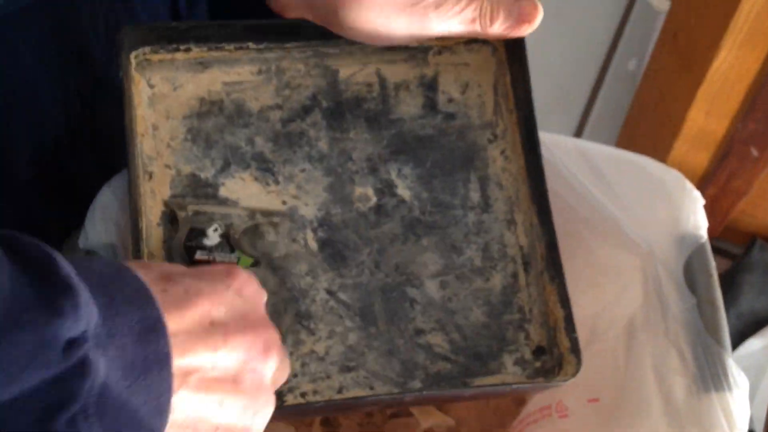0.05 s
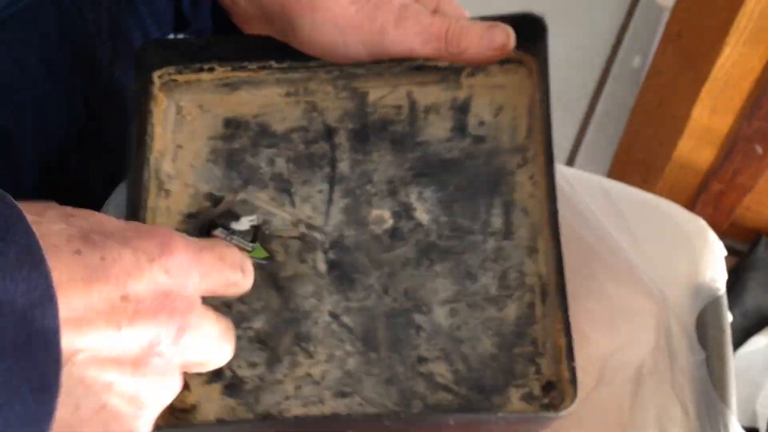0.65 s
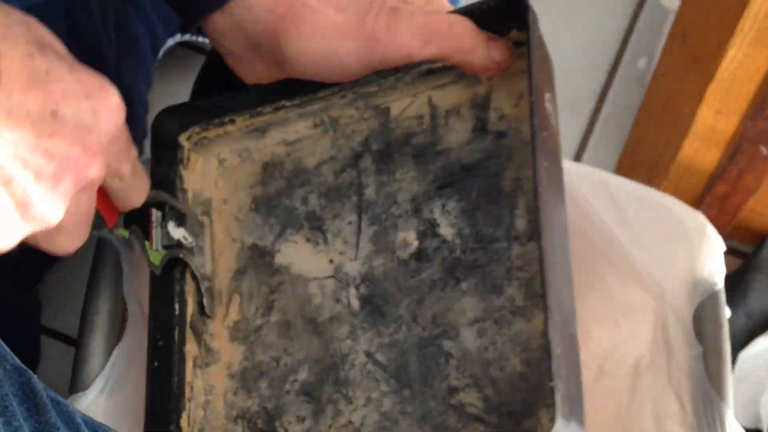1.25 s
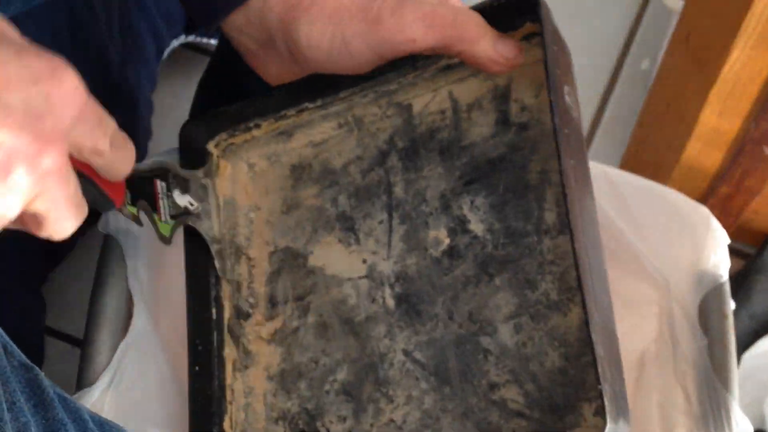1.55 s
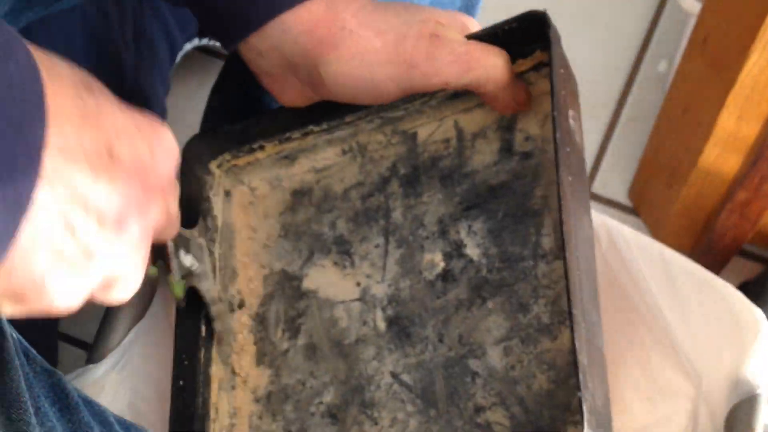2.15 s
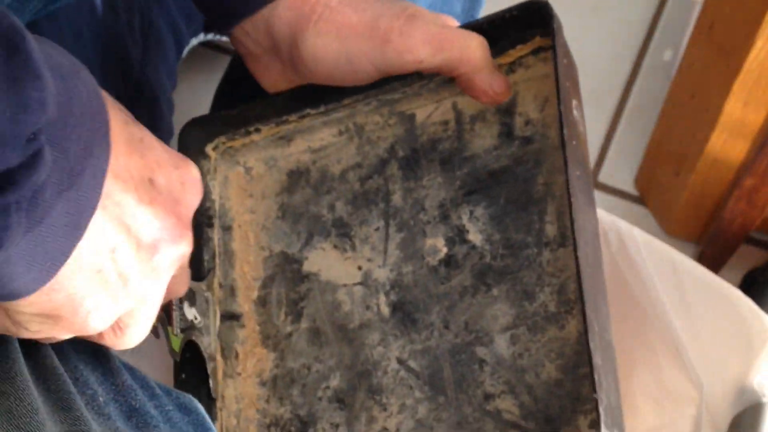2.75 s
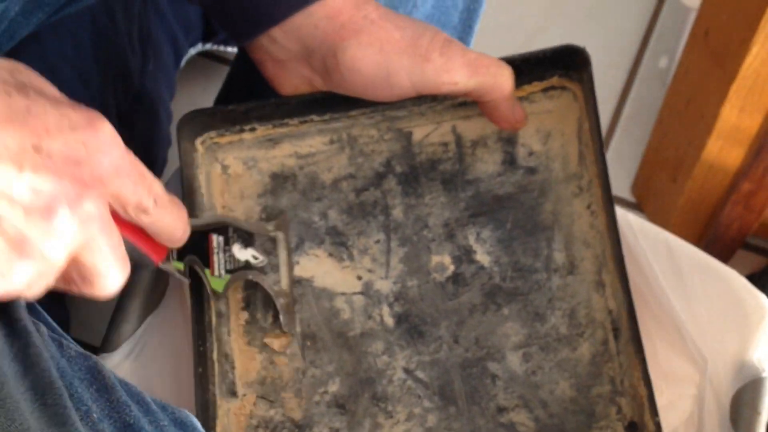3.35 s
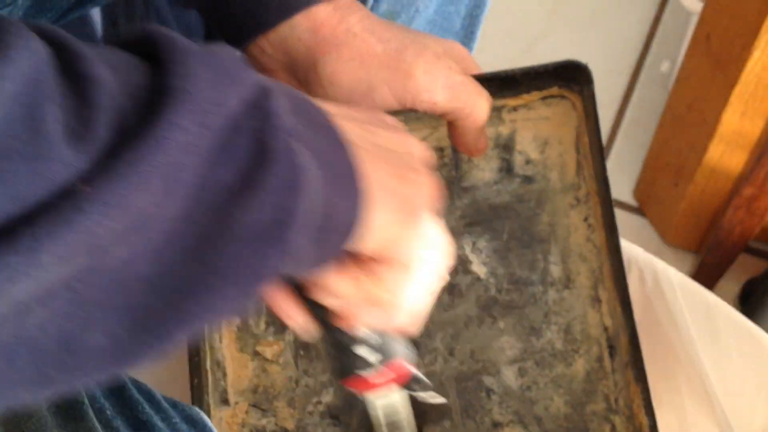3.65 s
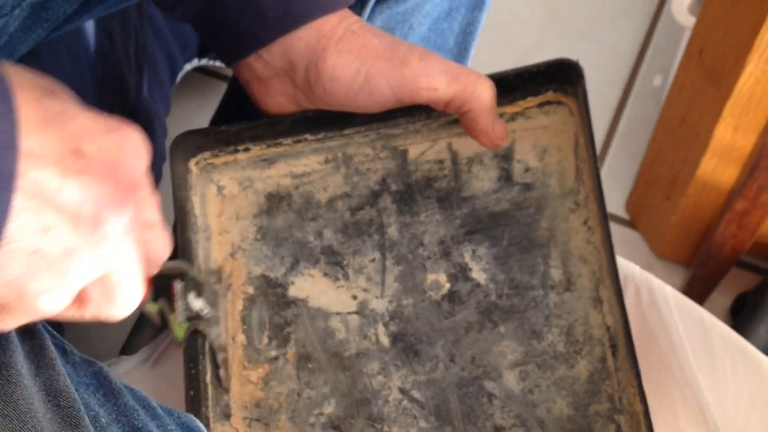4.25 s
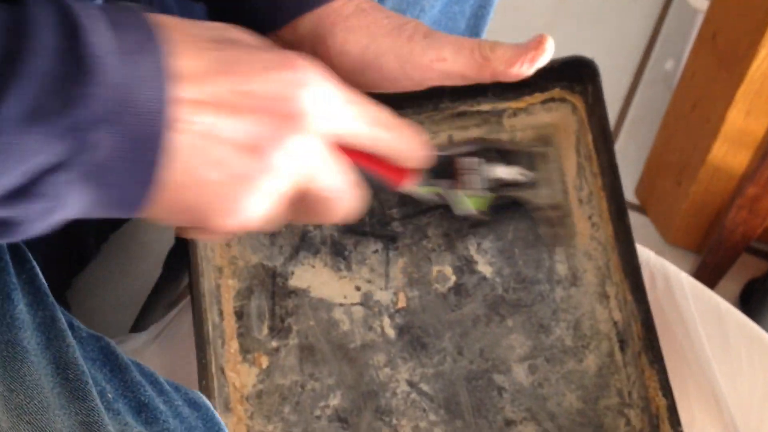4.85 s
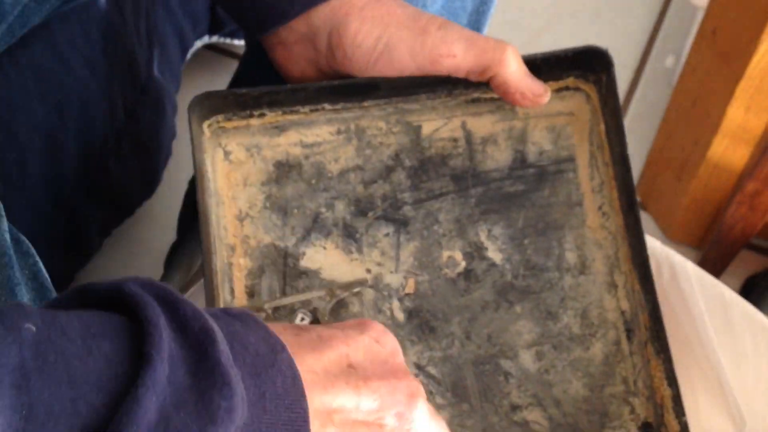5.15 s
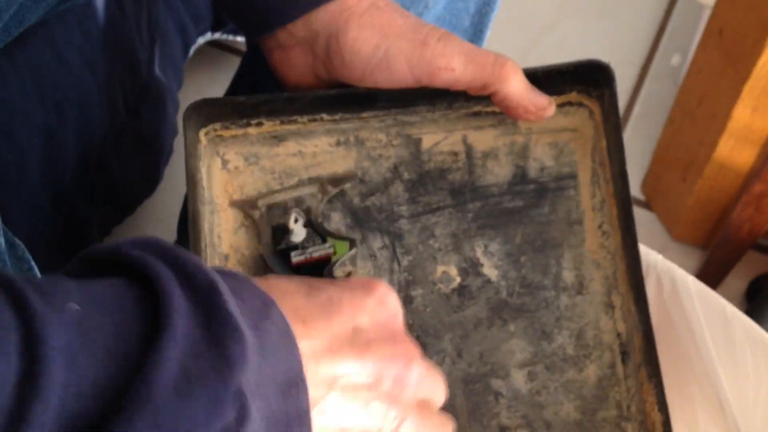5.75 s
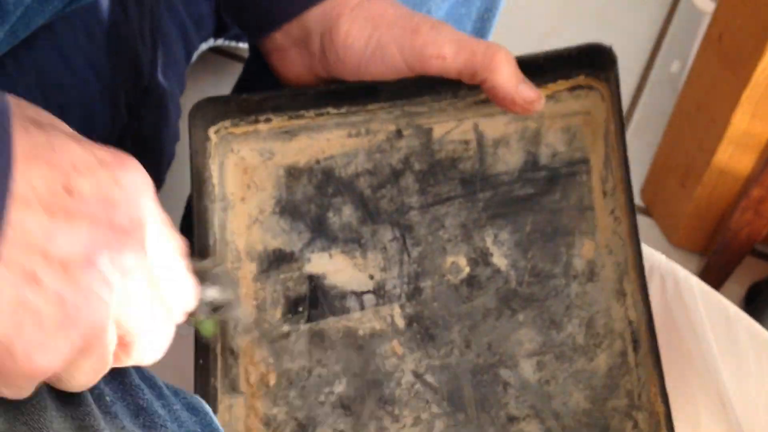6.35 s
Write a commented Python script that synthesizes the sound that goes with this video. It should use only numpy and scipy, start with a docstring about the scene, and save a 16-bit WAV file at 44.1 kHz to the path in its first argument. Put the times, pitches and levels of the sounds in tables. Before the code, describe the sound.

A small steel scraper scratches and chips hard crust off a metal pan, with irregular gritty rasps, ticks and dull knocks.

```python
"""Scraping scale off a pan

A steel hand scraper works hard mineral scale off a hand-held pan, close by in a small room.
Short bites and longer drags crush grit under the edge, and the grit rings both pan and blade.
The edge knocks on the crust and skids lightly over it; crumbs snap off with bright ticks and patter down.
The pan bumps dully in the hand as the blade lets go. Faint room tone lies underneath."""
import sys
import numpy as np
from scipy import signal
from scipy.fft import rfft, irfft, next_fast_len
from scipy.io import wavfile
from scipy.ndimage import uniform_filter1d

SR = 44100
rng = np.random.default_rng(int(sys.argv[2]) if len(sys.argv) > 2 else 0)


def master(y):
    """Save y as 16-bit WAV."""
    cut = np.clip(np.atleast_2d(y).T, -1, 1)
    pcm = np.round(cut * 32767)  # scale
    wavfile.write(sys.argv[1], SR, pcm.astype(np.int16))


N = 291060

# the edge digs in: t/s of greatest force, rise/s, fine grit level/dB, coarse over fine/dB
BITES = [(-.008,0.017,-65.5,17),(0.063,0.029,-66,-1),(.239,0.013,-50.5,4),(.303,0.013,-53,-1.5),(.359,0.0067,-51,11),(.376,0.013,-45.5,-3),(.438,0.015,-55,-5.5),(0.505,.008,-61.5,7.5),(0.548,0.0092,-55.5,0.5),(.593,0.014,-53,-0.5),(0.666,0.013,-67.5,5),(.786,0.0066,-85,21),(.903,0.0081,-68,11.5),(.943,0.016,-60.5,4.5),(.987,0.013,-62,8.5),(1.067,0.0086,-66.5,11.5),(1.1,0.0049,-68.5,14),(1.166,0.0069,-39.5,5),(1.32,0.022,-52.5,5),(1.414,.012,-60.5,7.5),(1.476,0.0075,-46.5,2),(1.575,0.012,-61,4),(1.751,0.011,-43,4.5),(1.915,0.026,-66.5,11.5),(1.944,0.0025,-49.5,8),(1.989,0.0057,-38.5,4.5),(2.063,0.02,-58,-0.5),(2.134,.012,-42.5,4.5),(2.212,0.0092,-51,0.5),(2.271,0.014,-52.5,5),(2.294,0.0091,-38.5,-1.5),(2.358,0.013,-50,1),(2.403,0.0093,-44,5),(2.464,.012,-53.5,5),(2.512,0.0067,-47,6.5),(2.549,0.0087,-44.5,7.5),(2.62,0.023,-58,1.5),(2.717,0.0088,-79,18.5),(2.787,.013,-59.5,9.5),(2.877,.0074,-39,5),(3.006,0.012,-42.5,-1.5),(3.062,.014,-55,-1.5),(3.1,0.0098,-49.5,3.5),(3.17,0.019,-54.5,-3),(3.231,.01,-56,0.5),(3.332,0.0053,-80,26),(3.416,0.0075,-68.5,5.5),(3.532,0.012,-75.5,9),(3.664,0.0083,-57.5,1),(3.709,0.0055,-54,-4.5),(3.752,0.011,-61.5,-2.5),(3.785,0.0069,-59.5,6.5),(3.955,.013,-54.5,4.5),(4.068,0.017,-61.5,-3),(4.13,0.012,-61.5,-1.5),(4.164,0.01,-56.5,0),(4.243,0.018,-61.5,4),(4.329,0.0059,-62,-6),(4.38,0.011,-56,-0.5),(4.447,0.0033,-44.5,-3.5),(4.462,0.0086,-56,6),(4.549,0.0095,-59.5,1.5),(4.637,0.014,-54.5,8),(4.701,0.019,-57.5,1),(4.893,0.019,-59,-13),(4.947,0.0098,-54.5,-2),(5.031,0.014,-56.5,-3),(5.115,0.0055,-75,17),(5.147,0.0073,-65.5,10.5),(5.189,.013,-64,2.5),(5.303,.011,-65.5,12),(5.415,.016,-48,6.5),(5.468,0.016,-45.5,-4.5),(5.544,0.0083,-53,5),(5.586,.011,-55,10.5),(5.634,0.012,-50.5,2),(5.667,0.01,-47,6.5),(5.713,0.013,-54,-10),(5.822,0.0083,-44.5,6.5),(5.91,0.0086,-46.5,-10),(5.972,0.008,-45.5,-3),(6.07,0.012,-59.5,12.5),(6.124,0.01,-51.5,4),(6.187,0.024,-54,-1),(6.251,0.012,-49.5,0),(6.499,0.0085,-73,16.5),(6.557,0.011,-50.5,3)]
# the edge slides on: start/s, end/s, fine grit level/dB, coarse over fine/dB
DRAGS = [(0.162, 0.224, -61, 4), (0.245, 0.378, -65, 1.5), (.42, 0.628, -75, -2.5),
         (.872, 1.037, -77.5, 4.5), (1.181, 1.428, -77, -16), (2.937, 2.973, -53.5, -0.5),
         (3.421, 3.54, -83, -14), (3.662, 3.89, -76.5, 4), (4.025, 4.14, -71.5, 3), (4.226, 4.277, -61, -2),
         (4.306, 4.348, -59.5, -1), (4.781, 4.845, -55.5, -8.5), (4.989, 5.033, -56.5, -10.5),
         (5.581, 5.612, -58, 3), (5.663, 5.73, -52.5, -2.5), (5.782, 5.868, -54, -4.5),
         (5.893, 5.945, -53, -11.5), (5.993, 6.028, -52, -8), (6.06, 6.104, -62, 2.5),
         (6.137, 6.213, -53.5, -2), (6.24, 6.262, -57.5, 1)]
# the pan's thud under the scraping: t/s, level/dB over the coarse grit
THUD = [(0, 6), (.45, -3), (1.15, 1), (1.47, -3.5), (1.8, 2), (2.1, -5.5), (2.55, -2.5), (3.2, 3),
        (4.5, 7.5), (4.64, -4.5), (4.72, -1), (4.87, -7), (5.2, 6), (5.42, -13), (5.67, -5), (5.83, -13),
        (6, -1), (6.25, -14), (6.55, 6.5)]
# the edge knocks on the crust: t/s, level/dB
LANDINGS = [(0.6927, -38.5), (0.8572, -36), (1.291, -38), (1.5634, -37), (1.6223, -44.5), (1.736, -26.5),
            (2.0978, -39), (2.2545, -45), (2.2887, -26), (2.543, -36), (2.6058, -36.5), (2.954, -33.5),
            (3.6356, -43), (3.8322, -40.5), (3.9412, -25.5), (5.106, -44.5), (5.1226, -45), (6.4969, -40)]
# a crumb snaps off: t/s, level/dB
SNAPS = [(0.9369, -49), (1.0629, -50), (1.1547, -29.5), (1.3275, -38), (1.737, -30.5), (1.757, -31.5),
         (1.9294, -40), (1.9809, -23.5), (2.1288, -31.5), (2.412, -34.0), (2.552, -33), (2.6056, -41.5),
         (2.8741, -27.5), (3.009, -34.5), (3.7396, -41)]
# the pan bumps as the blade lets go: t/s, level/dB
BUMPS = [(0.251,-27),(0.286,-31.5),(0.521,-36.5),(.79,-36),(1.093,-34),(1.179,-32),(1.362,-33),(1.766,-35),(1.787,-32.5),(2.024,-31),(2.157,-32),(2.302,-24.5),(2.55,-47),(4.701,-40),(4.8,-41.5),(5.974,-36),(6.101,-53),(6.46,-47.5)]
# light skids that leave the blade free to sing: t/s, level/dB
SKIDS = [(0.057, -61), (0.241, -52.5), (0.306, -51.5), (0.665, -60), (1.408, -57), (1.469, -42.5),
         (1.823, -58), (2.05, -61), (3.232, -58), (3.752, -52.5), (3.86, -61), (4.635, -56), (4.885, -57),
         (6.168, -50.5)]
# modes of the hand-damped pan: f/Hz, level/dB over the broad response
PAN_MODES = [(120, 3), (160, -5), (205, 9.5), (295, 5), (405, 1), (548, 9), (775, 0), (915, 0.5),
             (1050, 7.5), (1180, 4.5), (1350, 1.5), (1920, -6), (3200, -2.5), (4240, -3), (4900, -2)]
# modes of the steel blade: f/Hz, level/dB
BLADE_MODES = [(4550, -10.5), (6350, -8), (7450, -6), (8750, -9), (9600, -3.5), (10000, -2.5), (11850, 1.5),
               (12280, 4.5), (14100, 0.5)]
# colour that the pan's open bottom boosts and its stiff rim cuts: f/Hz, level/dB
BOTTOM_EQ = [(150, -0.5), (290, 1.5), (400, -2.5), (580, 4.5), (750, 3), (950, 1.5), (1300, 0.5),
             (2200, 0.5)]
# bright rasp of fine grit: f/Hz, level/dB
FINE_EQ = [(600, -33), (1500, 4.5), (2600, 4), (4500, 3), (6500, -2), (9000, 1.5), (11000, -1.5),
           (15200, -2)]
# midrange crunch of coarse grit: f/Hz, level/dB
COARSE_EQ = [(200, -25), (400, -5), (540, -3.5), (690, -7.5), (1100, -2), (1500, -4), (2300, -11.5),
             (4000, -18.5), (7000, -31.5), (15000, -40)]
# low body of a push on the pan: f/Hz, level/dB
PUSH_EQ = [(25, -29.5), (60, -7.5), (110, -1.5), (180, 3), (400, -2), (520, -13.5), (900, -8), (3000, -83)]
# the room's decay: f/Hz, t60/s
ROOM_DECAY = [(1500, 0.18), (14000, 0.12)]
# spectrum of the room tone: f/Hz, level/dB
ROOM_TONE_EQ = [(20, -9), (50, 0), (100, -5), (200, -7), (500, -17), (1200, -24), (4000, -35), (15000, -38)]

RIM_START_S, RIM_END_S = 0.75, 3.6  # the blade works the rim in this span, otherwise the bottom
SIZE = 2 ** 13  # samples in one contact
LEAD = SIZE // 3  # samples before its peak
TIME = (np.arange(SIZE) - LEAD) / SR  # s from the peak
HZ = np.fft.rfftfreq(SIZE, 1 / SR)


def bites(fall_per_rise=1.058):
    """Short strokes: the force swells until the crust gives way, then lets go a little slower."""
    track = np.zeros(N)
    for s, rise, fine_db, coarse_over_db in BITES:
        force = swell(TIME, rise, fall_per_rise * rise)
        add(track, s, scrape(s, force, fine_db, coarse_over_db))
    return track


def drags(patch_s=0.06, fade_s=0.0094, sway_db=3, sway_per_s=51):
    """Long strokes: a held, swaying force carries the edge from one patch of scale into the next."""
    track = np.zeros(N)
    crossfade = np.sqrt(np.maximum(1 - np.abs(TIME) / patch_s, 0))
    sway = amp(sway_db * wobble(np.arange(N) / SR * sway_per_s))
    for start, end, fine_db, coarse_over_db in DRAGS:
        for s in patch_s * np.arange(start // patch_s, end // patch_s + 2):
            outside_s = s + TIME - np.clip(s + TIME, start, end)
            force = crossfade * swell(outside_s, fade_s, fade_s)
            add(track, s, scrape(s, force, fine_db, coarse_over_db))
    return sway * track


def scrape(s, force, fine_db, coarse_over_db, judder_db=3, judder_per_s=330):
    """The edge sticks and slips through fine dust and coarser crumbs; the crumbs shove the pan."""
    coarse_db = fine_db + coarse_over_db
    push_db = coarse_db + np.interp(s, *np.transpose(THUD))
    slips = force * amp(judder_db * wobble((TIME - TIME[0]) * judder_per_s))
    fine = slips * grit(per_s=12000, spread_db=4.0)
    coarse = slips * grit(per_s=2300, spread_db=3.0)
    push = slips * grit(per_s=1200, spread_db=0.5)
    return contact(s, [fine, coarse, push], [FINE_EQ, COARSE_EQ, PUSH_EQ],
                   [fine_db, coarse_db, push_db], np.sum(force ** 2))


def grit(per_s, spread_db):
    """Grains break at random moments, as clicks of uneven size and either sign."""
    chance, size = rng.uniform(-1, 1, SIZE), rng.standard_normal(SIZE)
    breaks = np.abs(chance) < per_s / SR
    return breaks * np.sign(chance) * amp(spread_db * size)


def swell(t, rise, fall):
    """Force on the blade at t seconds from its peak: a rounded top with exponential flanks."""
    flank_s = np.maximum(np.where(t < 0, rise, fall), 1e-4)
    return amp(-20 * (np.hypot(1, t / flank_s) - 1))


def edge_lift(lift_s=0.028, duck_db=-8.5):
    """Gain that ducks the scraping as the edge leaves the crust just before each landing."""
    t = np.arange(N) / SR
    in_air = sum(np.interp(t, [s - lift_s, s], [0, 1], left=0, right=0) for s, _ in LANDINGS)
    return amp(duck_db * in_air)


def contact(s, forces, eqs, levels_db, energy):
    """The forces of one touch at time s ring the same modes, each through its own EQ at its own level."""
    place = -1 if RIM_START_S < s < RIM_END_S else 1
    modes = pan_and_blade() * amp(place * curve(BOTTOM_EQ, HZ))
    sound = np.zeros(SIZE)
    for force, eq, db in zip(forces, eqs, levels_db):
        response = minimum_phase(modes * amp(curve(eq, HZ)))
        sound += amp(db) * with_energy(irfft(rfft(force) * response), energy)
    return sound


def pan_and_blade(blade_db=2):
    """Gain of pan and blade in contact; the pan's crowded minor modes add a shifting ripple."""
    pan = mode_peaks(PAN_MODES, lambda hz: 22 + 0.038 * hz, shift_db=3.5, detune=0.012)
    crowding = HZ / (HZ + 700)  # the minor modes thicken with frequency
    ripple = amp(2.2 * crowding * wobble(HZ / 260))
    return ripple * np.sqrt(1 + pan + amp(blade_db) ** 2 * blade())


def blade():
    """Power response of the thin steel, which rings in a few high modes."""
    return mode_peaks(BLADE_MODES, lambda hz: 150, shift_db=-4.0, detune=0.0081)


def mode_peaks(modes, width_hz, shift_db, detune):
    """Power response of a set of modes; each grip and point of contact shifts them at random."""
    hz, db = np.transpose(modes)[:, :, None]
    strength = amp(db + shift_db * rng.standard_normal(db.shape))
    centre = hz * (1 + detune * rng.standard_normal(hz.shape))
    off_centre = 2 * (HZ - centre) / width_hz(hz)
    return np.sum(strength ** 2 / (1 + off_centre ** 2), axis=0)


def ticks(events, fine_db, coarse_db, push_db):
    """Each tick is one sharp blow inside a few milliseconds of crumbling crust."""
    track = np.zeros(N)
    crumbling = 0.36 * swell(TIME, rise=0.0004, fall=0.003)
    for s, db in events:
        blow = (TIME == 0) + crumbling * grit(per_s=12000, spread_db=4.5)
        knock = uniform_filter1d(blow, size=10)  # the crust cushions the blow to the pan
        tick = contact(s, [blow, knock, knock], [FINE_EQ, COARSE_EQ, PUSH_EQ],
                       [db + fine_db, db + coarse_db, db + push_db], energy=0.00061 * SR)
        add(track, s, tick)
    return track


def bumps(softness_s=0.0014):
    """A single soft push rings only the pan's lowest modes."""
    track = np.zeros(N)
    push = np.exp(-(TIME / softness_s) ** 2)
    for s, db in BUMPS:
        add(track, s, contact(s, [push], [PUSH_EQ], [db], energy=0.00042 * SR))
    return track


def skids():
    """The edge barely touches, so dust excites the undamped blade alone."""
    track = np.zeros(N)
    force = swell(TIME, rise=0.0024, fall=0.013)
    for s, db in SKIDS:
        dust = force * grit(per_s=3900, spread_db=2)
        ring = irfft(rfft(dust) * minimum_phase(np.sqrt(blade())))
        add(track, s, amp(db) * with_energy(ring, np.sum(force ** 2)))
    return track


def crumbs(count=1500, mean_flight_s=0.042, spread_db=4, typical_peak_db=-66):
    """Loosened crumbs fly from the bites and patter faintly on the pan."""
    which_bite, flight_draw = rng.random((count, 2)).T
    thrown_s = np.array(BITES)[(which_bite * len(BITES)).astype(int), 0]
    landing_s = np.abs(thrown_s - mean_flight_s * np.log(flight_draw))
    sizes = amp(spread_db * rng.standard_normal(count))
    patter = np.bincount((landing_s * SR).astype(int), sizes, N)[:N]
    colour = amp(curve(FINE_EQ, HZ)) / 2 + 2 * amp(curve(COARSE_EQ, HZ))
    click = irfft(minimum_phase(pan_and_blade() * colour))
    return amp(typical_peak_db) * signal.fftconvolve(patter, click / np.abs(click).max())[:N]


def room_reverb(x, predelay_s=0.0031):
    """A small room answers with a short tail whose treble dies first."""
    hz, t, noise = signal.stft(rng.standard_normal(SR // 2), SR, nperseg=256)
    decay = amp(-60 * t / curve(ROOM_DECAY, hz)[:, None])
    tail = signal.istft(noise * decay, SR, nperseg=256)[1]
    predelay = np.zeros(round(predelay_s * SR))
    return signal.fftconvolve(x, np.concatenate([predelay, tail / np.linalg.norm(tail)]))[:N]


def room_tone(rms_db=-75):
    """A faint, steady bed of dark noise."""
    hz = np.fft.rfftfreq(N, 1 / SR)
    spectrum = rfft(rng.standard_normal(N)) * amp(curve(ROOM_TONE_EQ, hz))
    return amp(rms_db) * with_energy(irfft(spectrum, N), N)


def amp(db):
    """Decibels to gain."""
    return np.exp(np.asarray(db) * (np.log(10) / 20))


def curve(points, hz):
    """Breakpoints (f/Hz, value) joined on a log frequency axis."""
    f, values = np.transpose(points)
    return np.interp(np.log(hz + 1), np.log(f + 1), values)


def with_energy(x, energy):
    """x scaled to a given sum of squares."""
    return x * np.sqrt(energy / (np.sum(x ** 2) + 1e-30))


def minimum_phase(gain):
    """The response with this gain that rings only after the blow."""
    cepstrum = irfft(np.log(np.maximum(gain, 1e-6)))
    cepstrum[1:SIZE // 2] *= 2
    cepstrum[SIZE // 2 + 1:] = 0
    return np.exp(rfft(cepstrum))


def wobble(steps):
    """A random curve that glides to a new value at each whole step."""
    knots = rng.standard_normal(512)
    return np.interp(steps, np.arange(len(knots)), knots)


def add(track, s, sound):
    """Lay one contact on the track, with its peak at time s."""
    start = round(s * SR) - LEAD
    lo, hi = max(start, 0), min(start + SIZE, N)
    track[lo:hi] += sound[lo - start:hi - start]


def scene():
    """Mono mix: the work is close, so the room is faint."""
    landings = ticks(LANDINGS, fine_db=-22, coarse_db=0, push_db=-4)  # dull, and they move the pan
    snaps = ticks(SNAPS, fine_db=0, coarse_db=-3.5, push_db=-25)  # bright, and they hardly move it
    scraping = edge_lift() * (bites() + drags())
    work = scraping + landings + snaps + skids() + bumps() + crumbs()
    return (work + amp(-24) * room_reverb(work) + room_tone())[None]


def record(dry, cutoff_hz=15350):
    """A steep low-pass takes off the very top of the treble."""
    size = next_fast_len(N + SIZE)
    hz = np.fft.rfftfreq(size, 1 / SR)
    lowpass = 1 / np.sqrt(1 + (hz / cutoff_hz) ** 200)
    return irfft(rfft(dry, size) * lowpass, size)[:, :N]


dry = scene()
out = record(dry)
master(out)
```